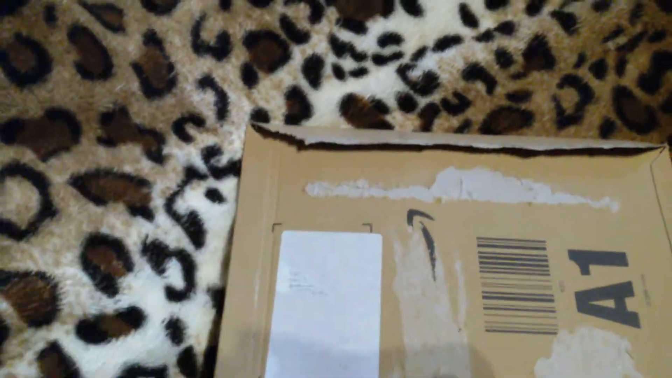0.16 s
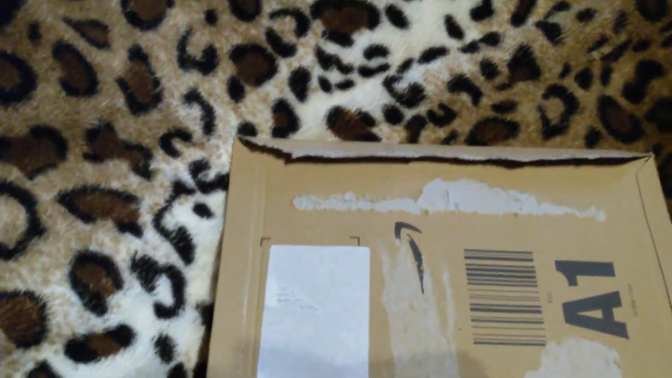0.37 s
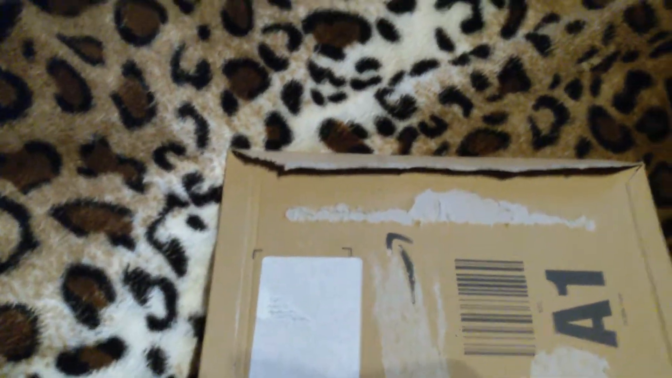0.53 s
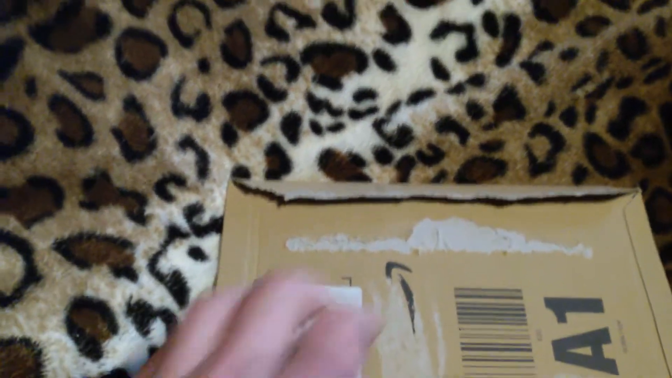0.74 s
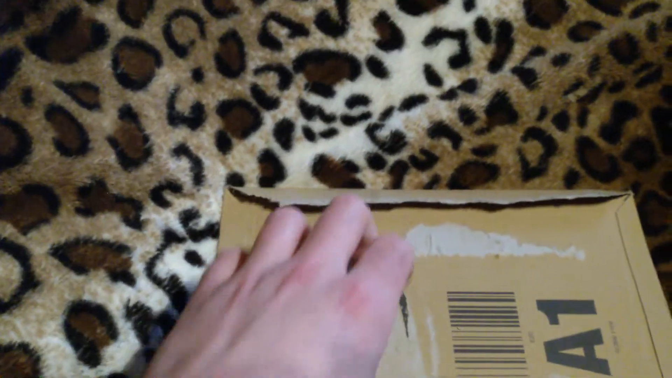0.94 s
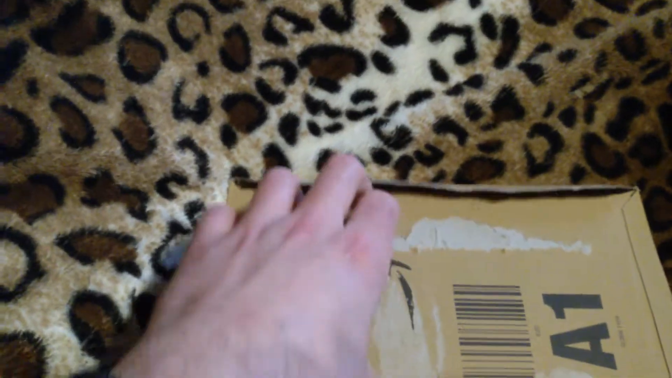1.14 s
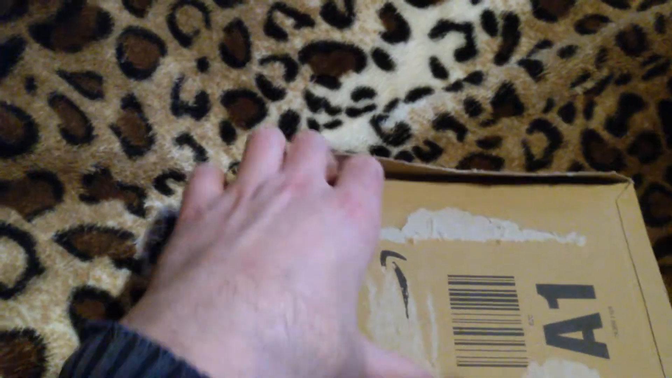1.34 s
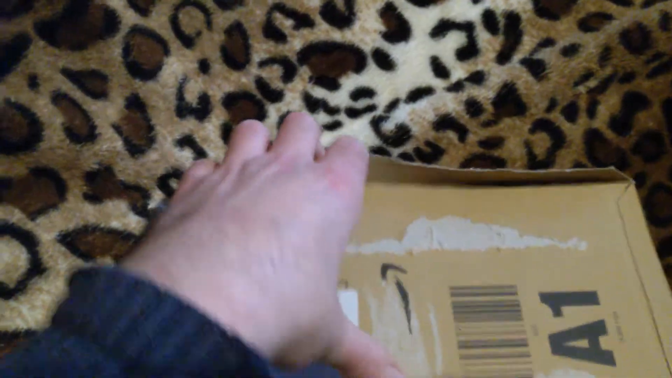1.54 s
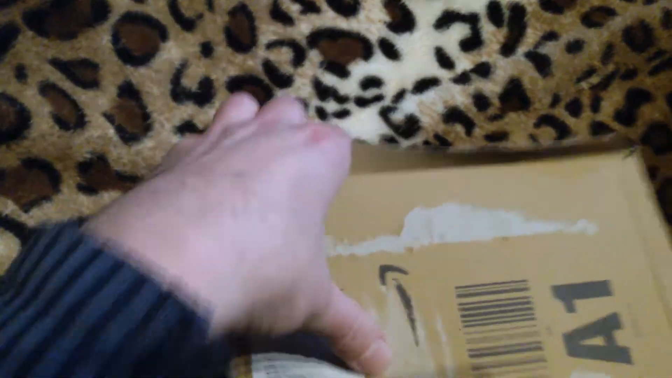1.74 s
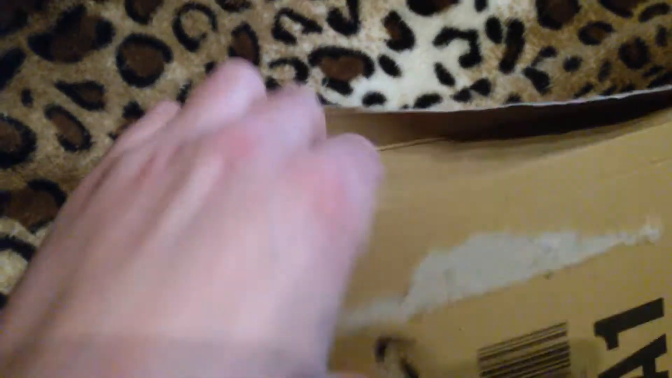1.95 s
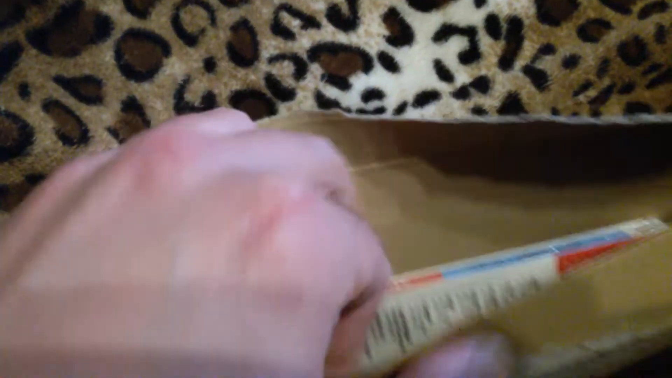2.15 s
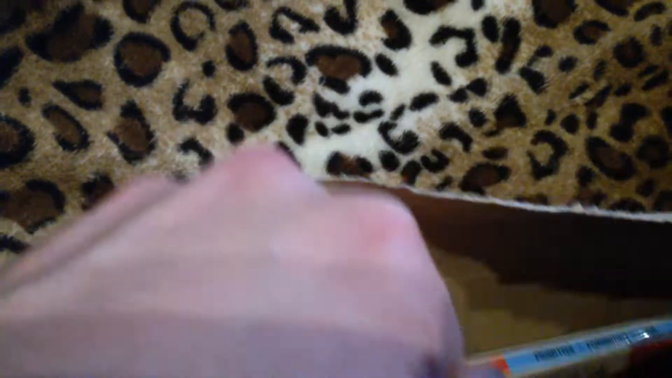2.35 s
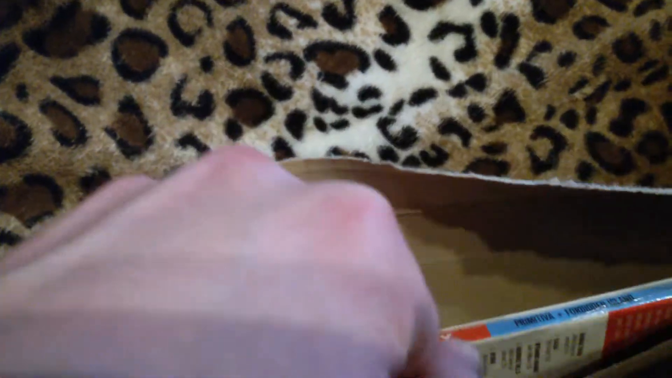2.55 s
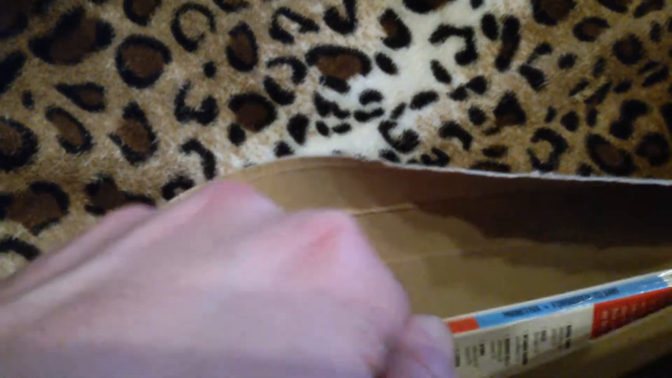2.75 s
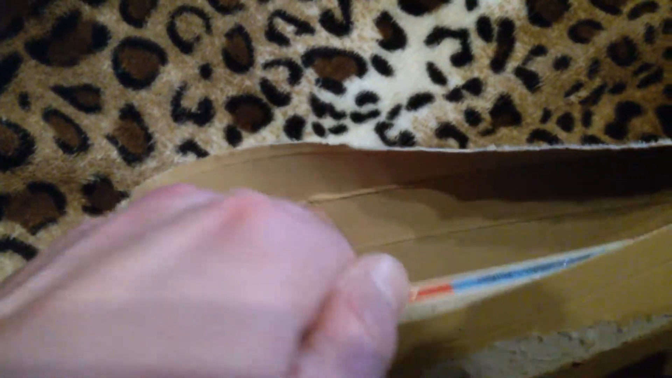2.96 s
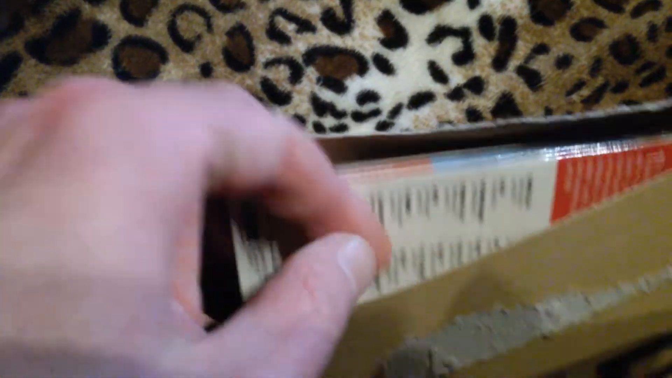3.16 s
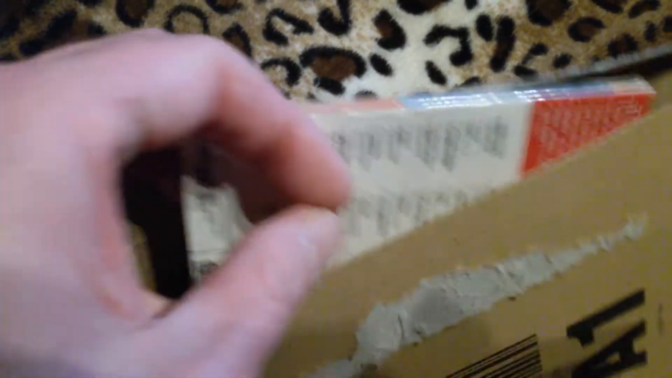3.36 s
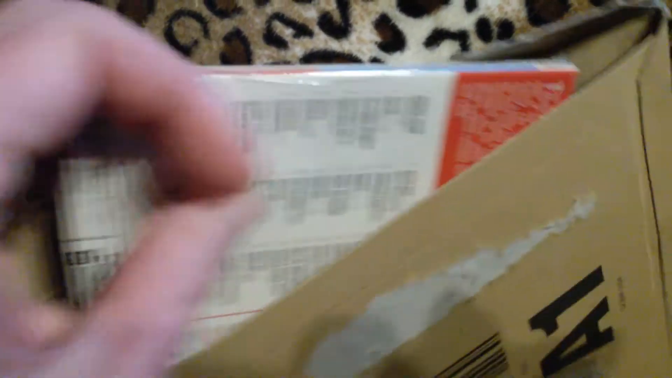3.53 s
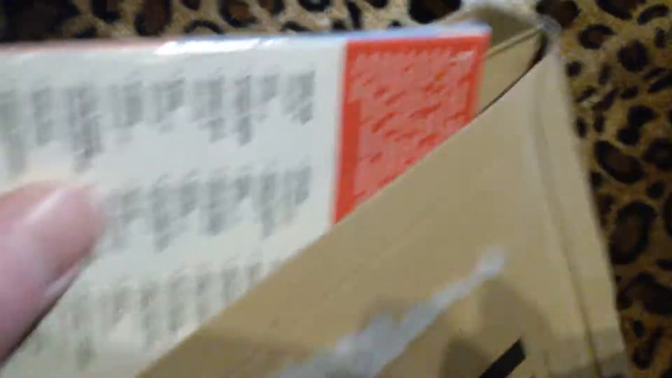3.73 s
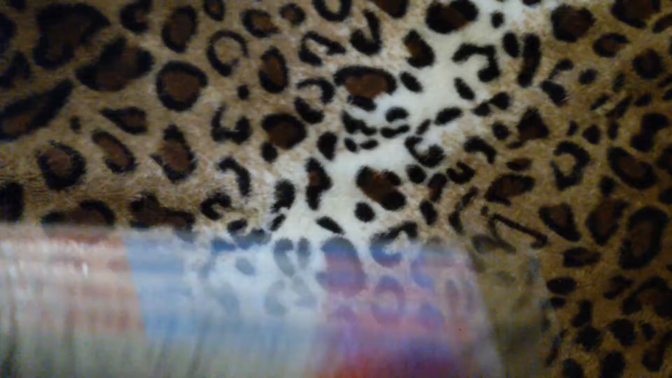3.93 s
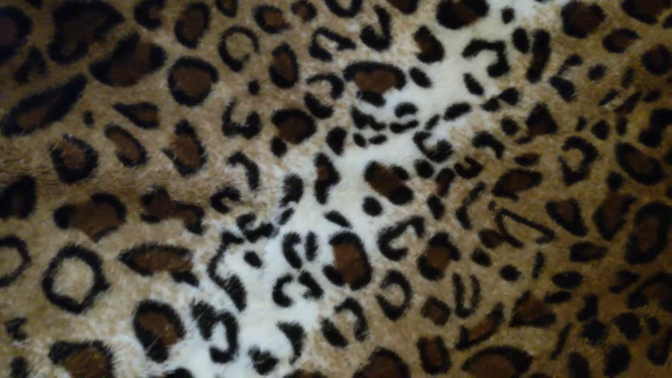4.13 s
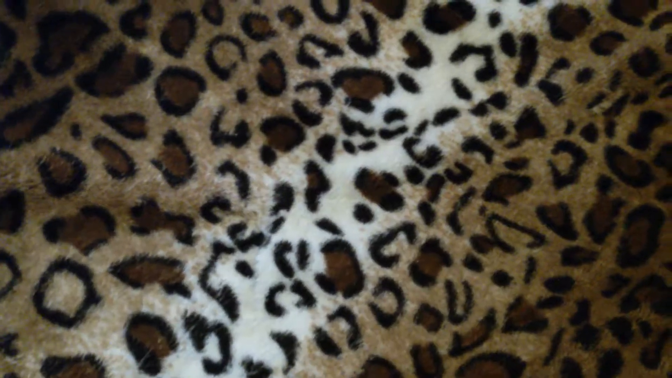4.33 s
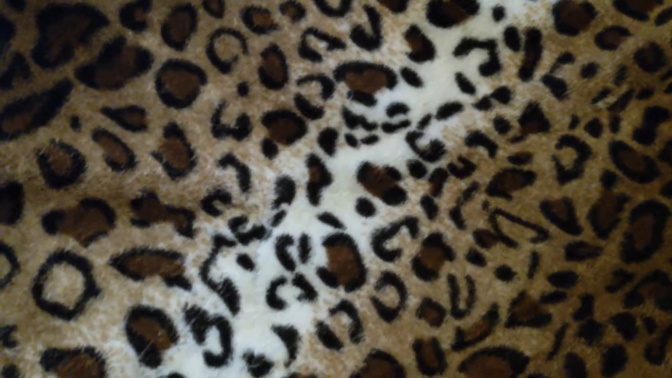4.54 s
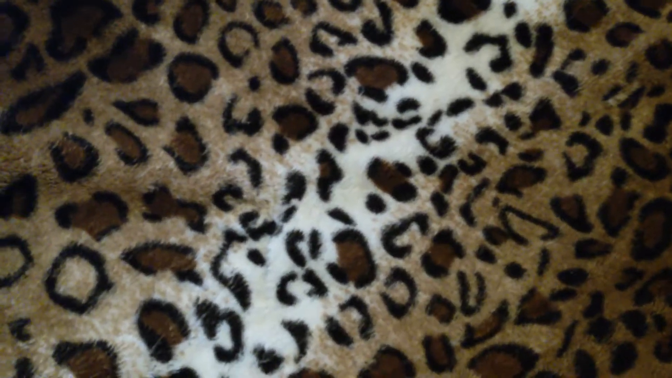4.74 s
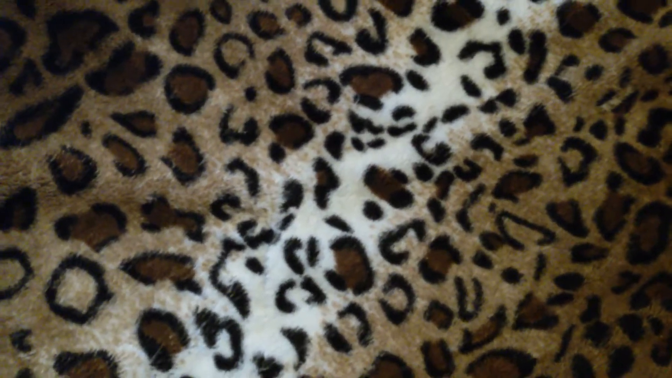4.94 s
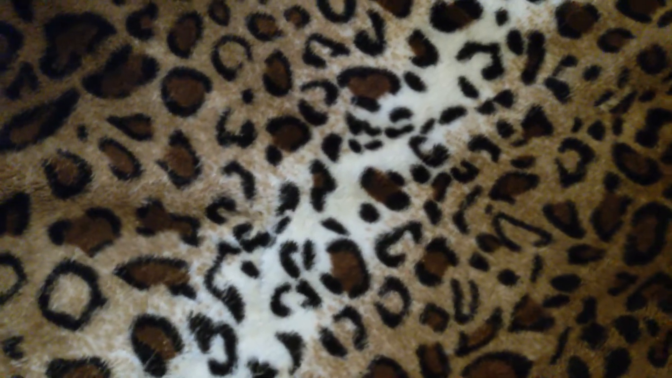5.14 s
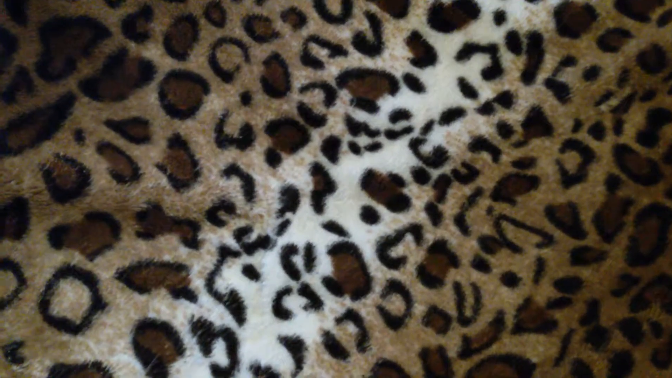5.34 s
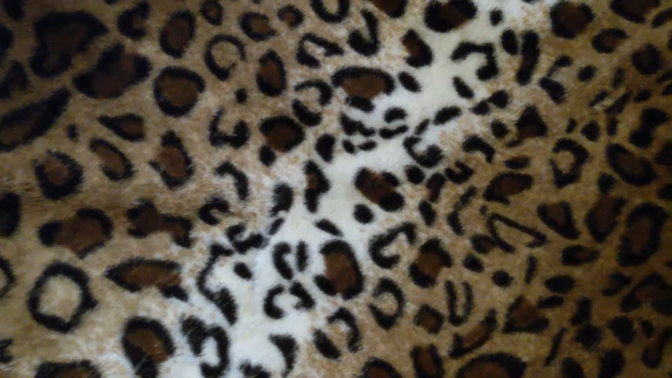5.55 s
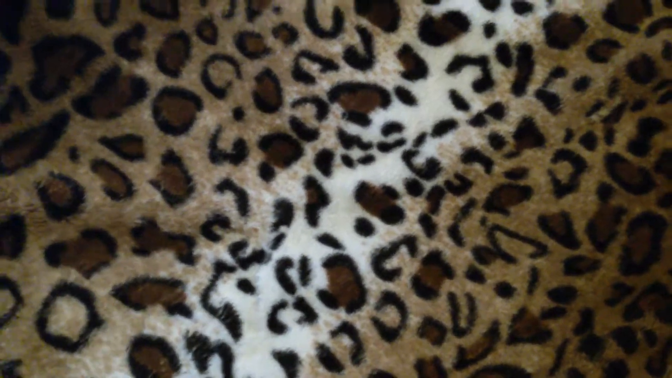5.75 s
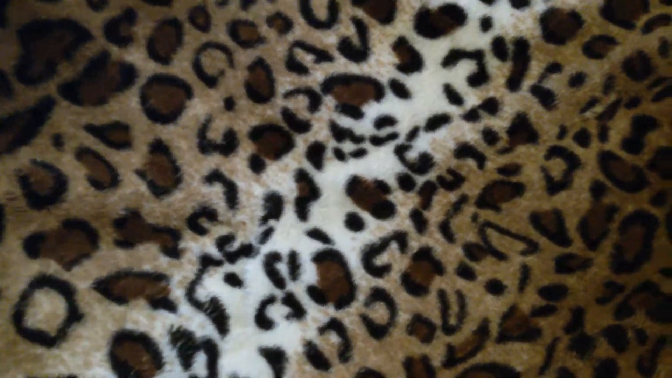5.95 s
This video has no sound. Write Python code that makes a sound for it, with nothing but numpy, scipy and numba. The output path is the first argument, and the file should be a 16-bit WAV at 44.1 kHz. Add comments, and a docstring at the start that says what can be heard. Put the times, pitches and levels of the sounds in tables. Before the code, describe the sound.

Close, dry cardboard scraping and cracking as hands open a mailer and drag out a pack, followed by light knocks and soft thumps.

```python
"""A cardboard mailer on a soft blanket is pulled open by hand and the flat pack inside is dragged out.
Stick-slip friction of skin and pack drives the board's resonances with dense tiny slips and brief squeaks.
The board buckles and fractures in short snaps and rips, and light knocks follow as things are set aside.
Soft low thumps sound beneath: two faint handling bumps, later the mailer bouncing on the blanket.
The small, furnished room is heard in mono from close by."""
import sys
import numpy as np
from scipy import signal
from scipy.fft import rfft, irfft
from scipy.io import wavfile
from scipy.ndimage import uniform_filter1d
from numba import njit

SR = 44100
rng = np.random.default_rng(int(sys.argv[2]) if len(sys.argv) > 2 else 0)


def inscribe(sig):
    """Save sig as 16-bit PCM at rate SR to the path in sys.argv[1].

    A 1-D sig is mono; a 2-D sig holds one channel per row.
    Samples are clipped to [-1, 1] before scaling.
    """
    pcm = np.round(np.clip(np.atleast_2d(sig).T, -1, 1) * 32767)
    wavfile.write(sys.argv[1], SR, pcm.astype(np.int16))


N = 264156


def from_db(db):
    """Amplitude ratio of a level in decibels."""
    return 10 ** (np.asarray(db) / 20)


def unit_rms(x):
    """Normalisation to an rms of 1."""
    return x / np.sqrt(np.mean(x ** 2) + 1e-20)


def drift(rate_hz):
    """Random modulation: low-passed noise of unit rms, drawn once every 40 samples."""
    pole = np.exp(-80 * np.pi * rate_hz / SR)
    slow = signal.lfilter([1], [1, -2 * pole, pole * pole], rng.standard_normal(N // 40 + 2002))[2000:]
    return np.interp(np.arange(N) / 40, np.arange(len(slow)), unit_rms(slow))


def band(x, edges_hz, order=3):
    """Causal band-pass filtering."""
    return signal.sosfilt(signal.butter(order, edges_hz, "band", fs=SR, output="sos"), x + 1e-18)


def soften(x, top_hz):
    """Compliance: soft contact and soft card act as a low-pass filter."""
    return signal.sosfilt(signal.butter(2, min(top_hz, .45 * SR), fs=SR, output="sos"), x)


def resonate(x, hz, width_hz):
    """A damped resonator with unit peak gain."""
    r = np.exp(-np.pi * width_hz / SR)
    feedback = [1, -2 * r * np.cos(2 * np.pi * hz / SR), r * r]
    return signal.lfilter(np.array([1, 0, -1]) * (1 - r * r) / 2, feedback, x + 1e-18)


@njit
def glide(x, hz, width_hz):
    """A damped resonator with unit peak gain whose centre and bandwidth vary in time."""
    angle = 2 * np.pi * hz / SR
    r = np.exp(-np.pi * width_hz / SR)
    y = np.zeros(len(x))
    for i in range(2, len(x)):
        drive = (1 - r[i] ** 2) / 2 * (x[i] - x[i - 2])
        y[i] = drive + 2 * r[i] * np.cos(angle[i]) * y[i - 1] - r[i] ** 2 * y[i - 2]
    return y


def slips(per_s, spread_db, size):
    """Stick-slip impulses: fibres catch and let go at random, with uneven strength."""
    strength = from_db(spread_db * np.minimum(rng.exponential(1, size), 4)) * rng.choice([-1, 1], size)
    return unit_rms(strength * (rng.random(size) < per_s / SR))


# Normal modes of the mailer: pitch_hz, width_hz, gain_db
BOARD_MODES = [(55.4, 84, -5), (98, 36, 6), (154, 64, -2), (238, 49, 3.5), (400, 690, -6.5), (533, 136, 2),
               (946, 80, -4.5), (953, 150, -5.5), (1500, 150, -1), (1714, 60, 9), (1964, 280, 2),
               (2420, 1800, -0.5), (3490, 100, -29), (3737, 22, 2.5), (4050, 4400, -2.5),
               (5840, 2100, -38.5), (9040, 430, -45)]

def board(force, extra_db, surface_db=-21):
    """Modal superposition: each mode with its extra gain, plus direct radiation from the surface."""
    modes = sum((-1) ** k * from_db(db + extra) * resonate(force, hz, width_hz)
                for k, ((hz, width_hz, db), extra) in enumerate(zip(BOARD_MODES, extra_db)))
    return modes + from_db(surface_db) * force


def stroke(start_s, attack_s, hold_s, release_s, level_db, thud_db, bright_db):
    """Friction power goes as speed squared: in each register a stroke rises, holds and dies away."""
    t = np.arange(N) / SR - start_s
    fade_db = -20 * np.clip((t - attack_s - hold_s) / release_s, 0, 10)
    speed = np.clip(t / attack_s, 0, 1) * from_db(fade_db)
    pocket_db = -2.5 + 0.55 * thud_db
    colour_db = np.array([thud_db, pocket_db, 0, bright_db])  # relative to the panels
    return np.outer(from_db(level_db + colour_db) ** 2, speed ** 2)


# Strokes of hand or pack along the board: start_s, attack_s, hold_s, release_s, level_db, thud_db, bright_db
RUB_STROKES = [(0.0, 0.00079, 0.0025, 0.081, -52.5, -0.5, 2), (0.948, 0.01, 0.015, 0.036, -42, -19, -6.5),
               (0.964, 0.02, 0.01, 0.038, -40, -14, -5), (1.016, 0.024, 0.017, 0.031, -42, -15.5, -3.5),
               (1.063, 0.0084, 0.014, 0.13, -52.5, -3.5, 4), (1.259, 0.071, 0.014, 0.15, -59.5, -34, 7),
               (1.415, 0.083, 0.027, 0.21, -49.5, -6, 1), (1.536, 0.081, 0.029, 0.11, -49, -2.5, 2.5),
               (1.65, 0.034, 0.015, 0.27, -51, 1.5, 0.5), (1.757, 0.16, 0.068, 0.12, -46.5, -6, -4.5),
               (1.954, 0.013, 0.099, 0.092, -38, -6.5, -6), (2.081, 0.069, 0.034, 0.079, -31.5, -4.5, -4),
               (2.178, 0.013, 0.048, 0.0095, -42.5, -4, -6.5),
               (2.258, 0.061, 0.034, 0.088, -44, -5.5, -6.5), (2.4, 0.031, 0.06, 0.07, -53, -5.5, -4),
               (2.53, 0.006, 0.027, 0.048, -46.5, -9, -10.5), (2.554, 0.031, 0.057, 0.085, -47.5, -2, -1.5),
               (2.698, 0.03, 0.041, 0.04, -52.5, -1, -3), (2.835, 0.057, 0.46, 0.25, -55, -10.5, -2),
               (2.972, 0.022, 0.13, 0.2, -43, -11, -5), (2.995, 0.016, 0.0078, 0.015, -42.5, -17, -3.5),
               (3.233, 0.015, 0.017, 0.08, -49.5, -10, -7), (3.416, 0.034, 0.034, 0.034, -46, -7.5, -6.5),
               (3.492, 0.1, 0.053, 0.16, -49, -4, -5.5), (3.767, 0.022, 0.025, 0.064, -48.5, -4, -9),
               (3.86, 0.02, 0.072, 0.17, -46, -7, -9.5), (3.913, 0.0061, 0.013, 0.038, -45, -1, -9),
               (3.998, 0.011, 0.0098, 0.14, -41, -7.5, -10.5), (4.036, 0.0075, 0.03, 0.06, -42, 3.5, -10.5),
               (4.187, 0.004, 0.032, 0.033, -46, -13.5, -13.5),
               (4.244, 0.041, 0.0069, 0.057, -42.5, -7, -15.5), (4.37, 0.04, 0.03, 0.21, -45, -6.5, -8),
               (4.529, 0.033, 0.082, 0.031, -44, -4, -4), (4.884, 0.0073, 0.048, 0.074, -57.5, 1.5, -4.5),
               (5.677, 0.066, 0.012, 0.07, -52.5, -9, -7.5), (5.822, 0.049, 0.024, 0.037, -44, -16.5, -8.5),
               (5.921, 0.011, 0.0049, 0.012, -45.5, -18, -10.5), (5.924, 0.018, 0.045, .05, -62.5, -1, 2.5)]
# Faint brushing while the hand keeps hold: start_s, hold_s
RESTING_GRIPS = [(0.928, 1.56), (2.794, 0.84), (3.798, 0.434), (4.39, 0.21)]

def rub_gains():
    """Incoherent sources add in power: strokes and grips give one gain curve for each register."""
    strokes = sum(stroke(*row) for row in RUB_STROKES)
    grips = sum(stroke(start_s, 0.091, hold_s, 0.06, level_db=-64, thud_db=0, bright_db=1.5)
                for start_s, hold_s in RESTING_GRIPS)
    return np.sqrt(strokes + grips)


# Path of the rubbed panel's resonances: time_s, note_hz, width_hz, gain_db, sheen_hz
PANEL_PATH = [(1.0, 2280, 600, 10, 5400), (1.35, 2166, 300, 14.5, 5300), (1.62, 2100, 280, 12.5, 5500),
              (1.95, 1780, 550, 14, 5100), (2.16, 1980, 450, 6, 5300), (2.41, 2180, 400, 11.5, 5530),
              (2.6, 2060, 450, 9, 5500), (2.95, 2180, 400, 12, 5300), (3.05, 1625, 300, 5, 5100),
              (3.11, 1910, 450, 12, 5000), (3.22, 2050, 500, 7.5, 4700), (3.55, 1870, 500, 13.5, 4640),
              (3.95, 1750, 550, 3, 5950), (4.25, 1810, 350, 5.5, 6040), (4.42, 1656, 200, 9.5, 5380),
              (4.55, 1690, 150, 8.5, 6100), (4.65, 1890, 250, 6, 6500), (5.75, 2100, 800, 12, 4400),
              (5.9, 2020, 900, 12, 4130)]

def panel(panel_force, paper_force, reference_width_hz=150, sheen_width_hz=550.0, sheen_db=-2.5):
    """A panel's resonance moves with the grip and its free length; its paper skin adds a high sheen."""
    time_s, *columns = np.transpose(PANEL_PATH)
    note_hz, width_hz, gain_db, sheen_hz = (np.interp(np.arange(N) / SR, time_s, c) for c in columns)
    equal_power = np.sqrt(reference_width_hz / width_hz)
    note = equal_power * glide(panel_force, note_hz, width_hz)
    sheen = glide(paper_force, sheen_hz, np.full(N, sheen_width_hz))
    return from_db(gain_db) * note + from_db(sheen_db) * sheen


def pocket_echo(x, round_trip_s=0.0025, echo_db=-13, wander=0.049):
    """Comb filtering: sound runs down the mailer and back by a path that shifts as hand and pack move."""
    lag = round_trip_s * SR * (1 + wander * drift(1.5))
    return x + from_db(echo_db) * np.interp(np.arange(N) - lag, np.arange(N), x)


# Registers of the mailer's thud, air pocket, panels and surface fibres: low_hz, high_hz
REGISTER_BANDS = [(36, 480), (410, 1200), (1250, 2600), (3400, 14000)]

def rubbing(judder_db=1.39, catch_db=1.5, crinkle_db=-14, shifting_db=4.0, local_modes_hz=600):
    """Sliding friction: dense slips under a juddering grip excite the modes from a moving contact."""
    grip = from_db(judder_db * drift(21) + catch_db * drift(200))  # catching skin makes the rub grainy
    crinkles = from_db(crinkle_db) * slips(per_s=90, spread_db=2.8, size=N)  # small creases give way
    board_force, panel_force, paper_force = (
        grip * (slips(per_s=3200, spread_db=0.5, size=N) + crinkles) for _ in range(3))
    # low modes span the whole mailer and depend less on where it is touched
    coupling_db = [shifting_db * min(hz / local_modes_hz, 1) * drift(2.44) for hz, _, _ in BOARD_MODES]
    vibration = board(board_force, coupling_db) + panel(panel_force, paper_force)
    sound = soften(pocket_echo(vibration), top_hz=11500)
    trims_db = (-2.8, 0, -.5, -.3)
    return sum(gain * from_db(trim_db) * unit_rms(band(sound, edges_hz))
               for gain, trim_db, edges_hz in zip(rub_gains(), trims_db, REGISTER_BANDS))


# Spectrum of the room's still air: frequency_hz, relative_density_db
AIR_SPECTRUM = [(20, -28), (45, -0.5), (100, -2.5), (200, -4), (320, -8.5), (600, -13), (1200, -17.5),
                (4000, -21), (9000, -23), (14500, -24)]

def air(level_db=-67.5, waver_db=2.2, rumble_top_hz=400):
    """Ambient noise: a quiet, steady spectrum whose low rumble wavers in amplitude."""
    hz, db = np.transpose(AIR_SPECTRUM)
    bins_hz = np.maximum(np.arange(N // 2 + 1) * SR / N, 1)
    shape = from_db(np.interp(np.log(bins_hz), np.log(hz), db))
    noise = unit_rms(irfft(rfft(rng.standard_normal(N)) * shape, N))
    rumble = signal.sosfiltfilt(signal.butter(2, rumble_top_hz, fs=SR, output="sos"), noise)
    return from_db(level_db) * (noise + rumble * (from_db(waver_db * drift(19)) - 1))


# Squeaks of tight board (narrow) and swishes of the pack's smooth wrap (wide):
# centre_s, half_length_s, pitch_hz, width_hz, level_db
FRICTION_SQUEAKS = [(.006, 0.01, 7950, 1330, -42), (.004, 0.0061, 4460, 400, -48.5),
                    (2.144, 0.0052, 3930, 220, -31), (2.156, 0.021, 756, 167, -34.5),
                    (2.192, 0.027, 630, 129, -41.5), (2.172, 0.047, 2026, 68.8, -40.5),
                    (2.173, 0.026, 5300, 300, -44), (3.26, 0.015, 7200, 3970, -52),
                    (3.798, 0.015, 10200, 4860, -63.5), (4.034, 0.0029, 5900, 1150, -37),
                    (4.044, 0.0047, 9900, 3500, -42.5), (4.436, 0.029, 3200, 400, -54.5),
                    (4.587, 0.011, 1774, 170, -42.5), (4.573, 0.022, 2600, 205, -52),
                    (4.576, 0.03, 3370, 126, -53.5), (4.583, 0.016, 3700, 260, -45.5),
                    (4.642, 0.0012, 6750, 980, -34)]

def squeaks(reach_s=0.15):
    """Stick-slip excitation of a single resonance swells and fades in a bell curve."""
    out = np.zeros(N)
    for centre_s, half_length_s, hz, width_hz, level_db in FRICTION_SQUEAKS:
        at = np.arange(max(round((centre_s - reach_s) * SR), 0), round((centre_s + reach_s) * SR))
        tone = resonate(resonate(rng.standard_normal(len(at)), hz, width_hz), hz, 2 * width_hz)
        swell = np.exp(-.5 * ((at / SR - centre_s) / half_length_s) ** 2)
        out[at] += from_db(level_db) * swell * unit_rms(tone)
    return out


def fracture(envelope):
    """Fracture is broadband: breaking fibres give a burst of unit energy spread over all pitches."""
    burst = slips(per_s=9000, spread_db=3.43, size=len(envelope)) * envelope
    for _ in range(4):  # flatten the spectrum, then restore the envelope
        white = irfft(np.exp(1j * np.angle(rfft(burst))), len(burst))
        burst = white * envelope / np.sqrt(uniform_filter1d(white ** 2, size=128) + 1e-12)
    return burst / np.linalg.norm(burst)


def buckling_force(give_s, settle_s=0.0019, flutter_s=0.018, flutter_db=-22):
    """Buckling: a crease cracks, fibres part while it gives, and the damped panel flutters to rest."""
    t = np.arange(6000) / SR
    since_give_s = np.maximum(t - give_s, 0)
    crack_db = -3 - 2.5 * np.log2(give_s / 0.0014)  # the quicker the give, the clearer the first crack
    rise_s = 0.00022 * from_db(-crack_db)  # after a weak crack the tearing swells in
    swell = 1 - np.exp(-(t + 1 / SR) / rise_s)
    force = fracture(swell * np.exp(-since_give_s / settle_s))
    force[0] += from_db(crack_db)
    flutter = soften(rng.standard_normal(len(t)), top_hz=3000) * np.exp(-since_give_s / flutter_s)
    return force + from_db(flutter_db) * flutter * np.linalg.norm(force) / np.linalg.norm(flutter)


def snap(give_s, note_hz, hollow_hz, top_hz, levels_db, direct_db=7.0, note_db=13.0, note_q=4.8):
    """Transient response: a buckling patch rings at its own note and drives the board and air pocket."""
    force = buckling_force(give_s)
    patch = from_db(direct_db) * force + from_db(note_db) * resonate(force, note_hz, note_hz / note_q)
    body = board(force, np.zeros(len(BOARD_MODES)))
    card = soften(soften(patch + body, top_hz), top_hz)
    hollow = resonate(force, hollow_hz, width_hz=220)
    thud = resonate(body + from_db(2.5) * force, hz=130, width_hz=330)  # the whole mailer pushes air
    parts = [band(x, edges_hz, order=2) for x, edges_hz in zip([thud, hollow, card, card], REGISTER_BANDS)]
    # each level is the rms of that register's energy packed into 10 ms
    gains = from_db(levels_db) / np.sqrt(np.sum(np.square(parts), axis=1) * 100 / SR)
    return sum((-1) ** k * gain * part for k, (gain, part) in enumerate(zip(gains, parts)))


def splinter(treble_db, hard_snap_db=-35, growth=2.2, decay_s=0.0012):
    """Brittle fracture of dry fibres grows faster than a snap's treble, so it marks the hardest snaps."""
    t = np.arange(1000) / SR
    burst = band(fracture(np.exp(-t / decay_s)), edges_hz=(3000, 9500), order=2) * np.sqrt(SR / 100)
    return from_db(-39.5 + growth * (treble_db - hard_snap_db)) * burst


# Snaps, rips and knocks of the board; the last three columns are relative to the level:
# start_s, give_s, note_hz, hollow_hz, level_db, thud_db, hollow_db, bright_db
BOARD_SNAPS = [(0.5001, 0.00014, 5470, 710, -69, -13, -20, 10.5),
               (0.88, 0.0039, 2440, 530, -52.5, -10, -8, -15),
               (0.8885, 0.0024, 2310, 816, -48, -6.5, -5.5, -2.5),
               (0.905, 0.0093, 2490, 760, -50.5, -5, -9, -6), (0.937, 0.0041, 2700, 850, -59, -11, -6, 1),
               (0.9875, 0.00073, 2140, 690, -50.5, -25, -1, -0.5),
               (1.058, 0.0081, 2580, 1010, -44, -36, -29, 2),
               (1.17, 0.0049, 2030, 1100, -45.5, -6, -19, -5),
               (1.183, 0.0082, 2020, 760, -49, -13, -11, -1),
               (1.286, 0.0013, 2210, 1040, -56.5, -17, -15, -3),
               (1.635, 0.0028, 2150, 1010, -47.5, -14, -13, -6),
               (1.701, 0.0013, 2570, 1030, -48, -4, -15, -9),
               (1.7136, 0.0071, 1580, 1220, -30.5, -17.5, -13.5, -4.5),
               (1.7208, 0.0055, 1600, 1170, -35.5, -22, -31, -7),
               (1.791, 0.0095, 2110, 507, -40, 2.5, 1, -5), (1.819, 0.0011, 1720, 1210, -39.5, -6, -8, -18),
               (1.8363, 0.0073, 1790, 606, -26, -14.5, -13, -9),
               (1.873, 0.0016, 1600, 1070, -41.5, -12, 0, -17),
               (1.901, 0.0019, 2360, 950, -29.5, -6, -3.5, -8.5),
               (1.971, 0.0012, 1480, 920, -28.5, -0.5, 0, -15.5),
               (1.98, 0.0037, 1610, 830, -39, -16, -2, -15.0),
               (2.0419, 0.0043, 1920, 800, -33, -6.5, -17, -6),
               (2.1352, 0.0055, 2050, 820, -34, -19, 3.5, -5.5),
               (2.165, 0.0011, 1970, 810, -36, -17, -17, -18),
               (2.172, 0.0068, 1900, 700, -38, -8.5, -7, -3), (2.213, 0.003, 1990, 700, -44, -6, -8, -5),
               (2.24, 0.0025, 1800, 615, -47.5, 2.5, -16, -4),
               (2.7402, 0.0014, 1395, 1120, -37.5, -25, -5.5, -12),
               (3.02, 0.0052, 2390, 910, -41, -15, -13, -11), (3.037, 0.011, 1570, 860, -35, -17, -22, -23),
               (3.348, 0.0088, 2010, 1030, -37, -11, -10, -11.5),
               (3.402, 0.0055, 2070, 1160, -37.5, -8.5, -4, -15),
               (3.616, 0.006, 1490, 920, -44.5, -7, 0, -12),
               (3.646, 0.0012, 1770, 940, -38.5, -3.5, -19, -10),
               (3.647, 0.0037, 1880, 1000, -38.5, -4, 1.5, -12),
               (3.814, 0.0022, 1680, 930, -48.5, -1.5, -2, -19),
               (3.828, 0.0055, 1480, 832, -51.5, -7, 0, -24),
               (3.927, 0.0031, 1910, 870, -44.5, -7, -1, -36),
               (4.031, 0.0013, 1670, 740, -43, -14, -13, -0.5),
               (4.0439, 0.0028, 1850, 980, -35.5, -8, -2, -11),
               (4.053, 0.0015, 1330, 1220, -38.5, -26, -6, -31),
               (4.057, 0.0035, 1410, 890, -31, -7, -8.5, -41),
               (4.191, 0.0037, 1780, 950, -48, -10, -11, -22), (4.25, 0.0095, 1470, 880, -47, -9, -14, -30),
               (4.265, 0.0044, 1770, 930, -44, -2.5, -1.5, -11),
               (4.389, 0.0017, 1610, 1130, -45.5, -5, -1.5, -4.5),
               (4.6276, 0.0067, 2450, 840, -37, -13, -6, -11),
               (4.637, 0.0011, 2130, 767, -52, 3.5, -0.5, -6),
               (4.898, 0.0043, 1480, 430, -38, -4, -13, -11), (4.914, 0.0064, 1900, 480, -50, -2, -22, -6),
               (5.067, 0.0062, 1500, 548, -56, 1.5, 5, -5),
               (5.2869, 0.0007, 1470, 1090, -43.5, -10.5, 2.5, -3.5),
               (5.4396, 0.00082, 1320, 1190, -58, -3.5, -4.5, -7.5)]

def snaps(bright_db_per_octave=25.5):
    """Impulsive excitation: the harder the contact, the brighter the snap and the higher it reaches."""
    out = np.zeros(N + SR)
    for start_s, give_s, note_hz, hollow_hz, level_db, thud_db, hollow_db, bright_db in BOARD_SNAPS:
        top_hz = 7200 * 2 ** (bright_db / bright_db_per_octave)
        levels_db = level_db + np.array([thud_db, hollow_db, 0, bright_db])
        at = round(start_s * SR)
        for part in (snap(give_s, note_hz, hollow_hz, top_hz, levels_db), splinter(level_db + bright_db)):
            out[at:at + len(part)] += part
    return out[:N]


# Soft low thumps, two faint handling bumps and then the mailer bouncing on the blanket:
# start_s, pitch_hz, level_db
LOW_THUMPS = [(0.697, 187, -56), (0.737, 134, -55.5), (1.978, 109.4, -29), (2.046, 96, -34),
              (4.062, 157, -40.5), (4.635, 86.2, -39), (4.905, 85.6, -43)]

def thumps(t60_s=0.15, rise_s=0.0015):
    """Damped oscillation: each soft thump is a low sine that dies away within a few cycles."""
    out = np.zeros(N)
    for start_s, pitch_hz, level_db in LOW_THUMPS:
        t = np.maximum(np.arange(N) / SR - start_s, 0)
        envelope = from_db(level_db - 60 * np.minimum(t / t60_s, 10)) * (1 - np.exp(-t / rise_s))
        out += envelope * np.sin(2 * np.pi * pitch_hz * t)
    return out


def room(x, t60_s=0.032, gap_s=0.005, level_db=-18.5):
    """Reverberation: absorption by soft furnishings leaves a short, faint tail."""
    t = np.arange(SR // 2) / SR
    reflections = band(rng.standard_normal(len(t)), edges_hz=[90, 7500], order=1)
    tail = reflections * from_db(-60 * t / t60_s) * (t > gap_s)
    return from_db(level_db) * signal.fftconvolve(x, tail / np.linalg.norm(tail))[:N]


def scene():
    """Superposition of the direct sound, its reverberation and the room's air, alike in both channels."""
    direct = rubbing() + squeaks() + snaps() + thumps()
    return np.tile(direct + room(direct) + air(), (2, 1))


def record(dry):
    """Band limiting: a steep low-pass cuts the treble above 14.8 kHz."""
    return signal.sosfilt(signal.ellip(10, .3, 80, 14800, fs=SR, output="sos"), dry)


dry = scene()
out = record(dry)
inscribe(out)
```